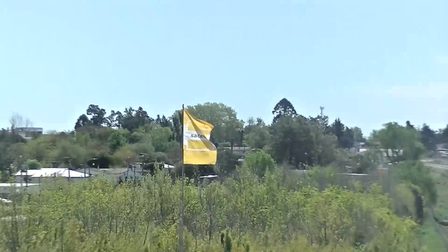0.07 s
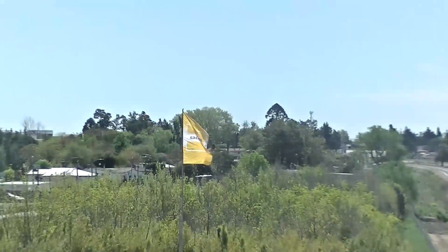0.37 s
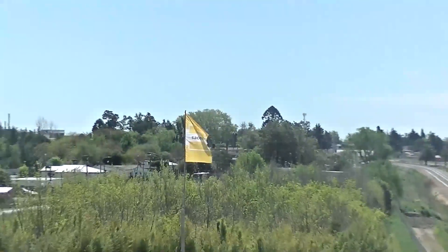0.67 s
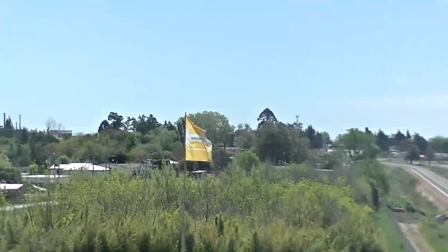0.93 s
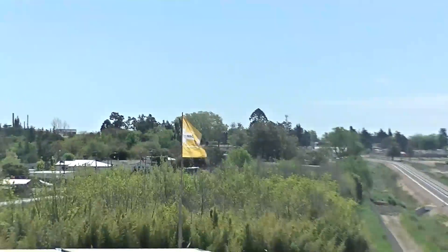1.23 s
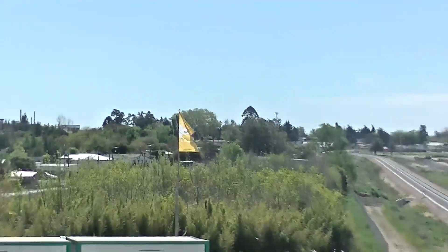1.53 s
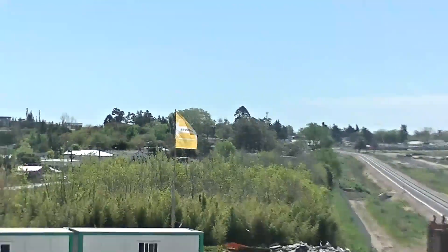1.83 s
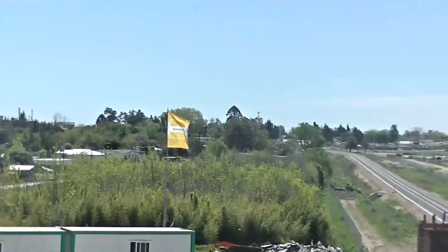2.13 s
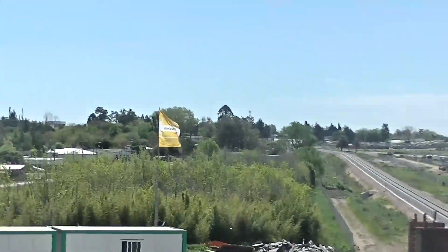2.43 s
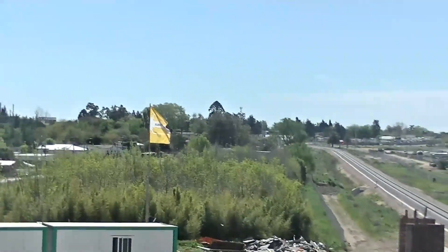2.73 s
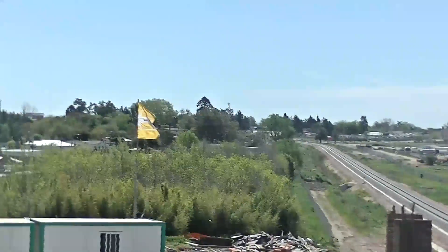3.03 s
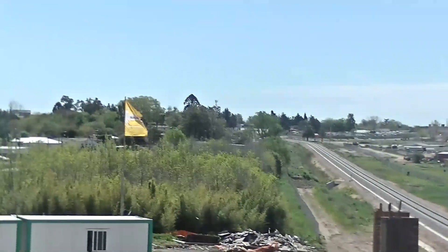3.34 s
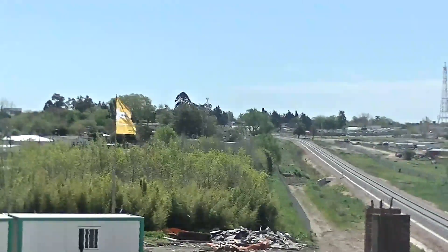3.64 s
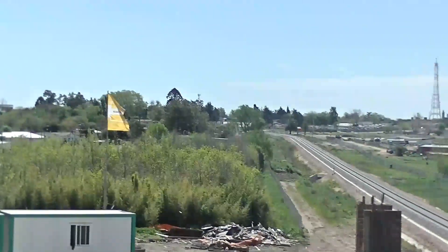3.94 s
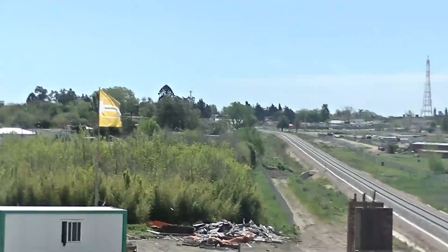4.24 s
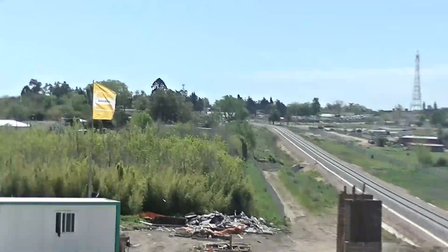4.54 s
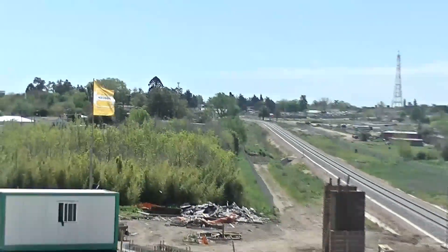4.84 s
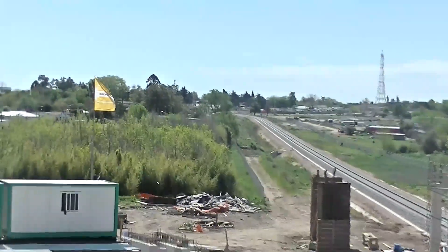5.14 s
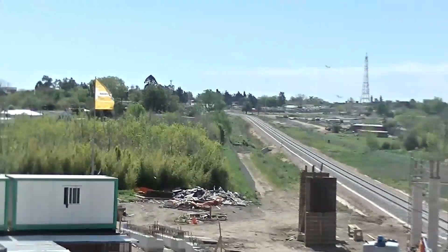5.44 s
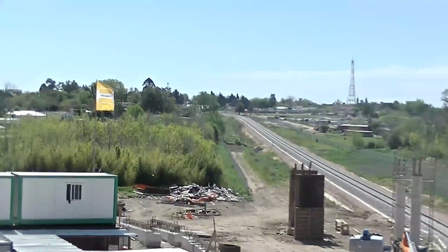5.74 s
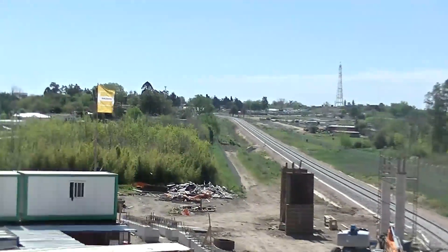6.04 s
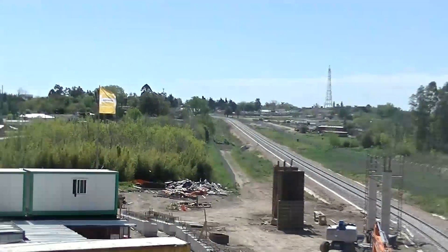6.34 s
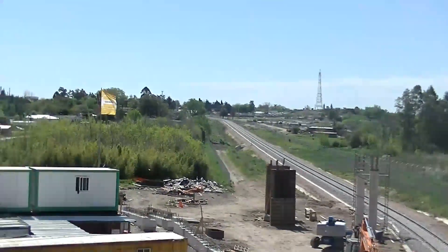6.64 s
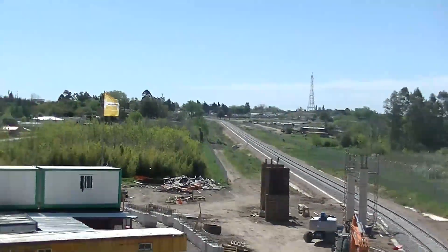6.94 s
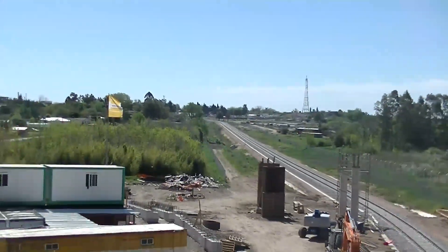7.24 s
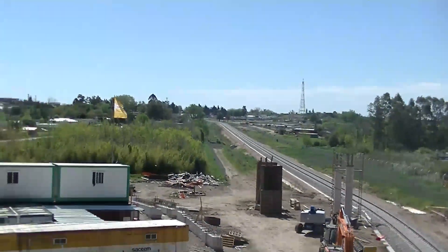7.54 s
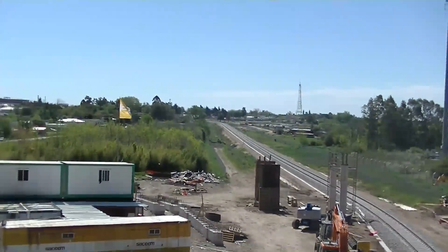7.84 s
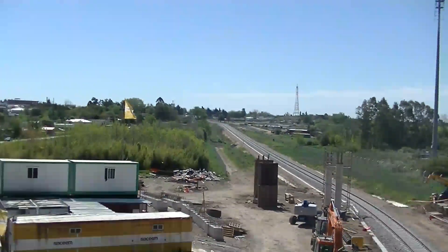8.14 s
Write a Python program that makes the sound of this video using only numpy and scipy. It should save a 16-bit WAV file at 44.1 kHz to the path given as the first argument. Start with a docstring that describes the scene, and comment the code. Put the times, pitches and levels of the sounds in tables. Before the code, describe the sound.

Outdoors, a parakeet gives a brief scratchy call and a squeal. A close plastic double click snaps in the pause, and a far bird whistles faintly once. Then comes a string of shrill, raspy parakeet bursts, peaking in a swooping squeal before turning quieter and sparser. The calls echo slightly off the ground and sheds, over a soft hiss of air, far traffic and a faint hum.

```python
"""Parakeets screech over an open building site: rasping runs of short notes from the syrinx,
some sliding into wavering squeals. Ground and sheds echo them. Two sharp plastic clicks ring
close to the microphone and a far bird whistles once; two soft blips pass. Distant traffic,
open air and a machine hum lie beneath, with a thin whine from the camera."""
import sys
import numpy as np
from scipy import signal
from scipy.fft import rfft, irfft, next_fast_len
from scipy.io import wavfile
from scipy.ndimage import uniform_filter1d, map_coordinates

SR = 44100
rng = np.random.default_rng(int(sys.argv[2]) if len(sys.argv) > 2 else 0)


def transcribe(signal):
    """Save signal, clipped to [-1, 1], as a 16-bit WAV file at the path in sys.argv[1]."""
    frames = np.atleast_2d(signal).T
    limited = np.clip(frames, -1, 1)
    pcm = np.round(limited * 32767).astype(np.int16)
    wavfile.write(sys.argv[1], SR, pcm)


N = 361179


def parakeet_chatter():
    """Runs of scooped notes: each call moves through a crest, arches in pitch and changes pace."""
    # calls: t/s, length/s, start and end pace/(notes/s), mid-call f/Hz, glide/share, note scoop/share,
    # start, crest and end level/dB, crest place/0-1, start and end odd harmonics/dB,
    # roughness/0-1, deepest dip between notes/dB
    calls = [(0.058, 0.22, 43.5, 34.3, 1080, 0.05, 0.034, -41.5, -38, -45, 0.85, 7, 4, 0.33, 11),
             (0.363, 0.042, 44, 55, 1156, 0.061, -0.03, -46, -39, -43, 0.5, -1.5, -4, 0.15, 6),
             (2.338, 0.23, 46.6, 57, 926, 0.063, 0.17, -52.5, -44, -53.5, 0.8, 1, -6.5, 0.55, 11),
             (2.718, 0.13, 38.2, 90, 1130, 0.0, 0.15, -36, -35.5, -35, 0.47, 1.5, -7, 0.45, 13),
             (3.056, 0.16, 35, 76.5, 1099, 0.038, 0.14, -42.5, -34.5, -34, 0.34, -2, 1, 0.43, 17),
             (3.352, 0.19, 50, 48, 1101, 0.053, 0.031, -41, -39.5, -36.5, 0.6, 3, -1.5, 0.51, 7),
             (3.54, 0.201, 58, 80, 985, -0.065, 0.4, -30.5, -30, -34, 0.72, -3, -13.5, 0.66, 9.5),
             (3.84, 0.17, 48.7, 56, 1062, -0.024, 0.13, -39, -39, -36, 0.24, 5, -1, 0.57, 6.5),
             (3.996, 0.14, 44, 88, 1072, -0.085, 0.26, -31, -28, -41, 0.61, -4, -14, 0.62, 11),
             (4.357, 0.21, 35.4, 41.8, 1219, 0.042, 0.1, -32, -25, -33.5, 0.67, 4.5, 5, 0.45, 11),
             (4.834, 0.234, 51, 65, 1300, 0.041, -0.21, -36.5, -31.5, -40, 0.79, -2, -2.5, 0.45, 20),
             (5.988, 0.202, 66, 88, 980, 0.05, 0.3, -39.5, -41, -47.5, 0.37, 1, -4.5, 0.24, 12),
             (6.231, 0.13, 48, 43, 1130, 0.0, 0.12, -45, -41, -51, 0.2, 0, -8, 0.32, 8),
             (6.632, 0.068, 33, 36, 898, -0.066, 0.05, -45, -43, -42.5, 0.48, -4.5, -6.5, 0.33, 5),
             (6.912, 0.13, 46, 36, 975, 0.096, 0.11, -46.5, -46.5, -51.5, 0.7, -4.5, -17, 0.36, 8),
             (8.091, 0.096, 42, 46, 927, -0.013, 0.04, -47.5, -44, -44, 0.5, -6, -3.5, 0.4, 18)]
    attack_s, attack_db, release_s = 0.028, 4, 0.0047
    arch, flick, detune_spread, slide_spread = 0.1, 0.2, 0.035, 0.04  # shares of the pitch
    t = np.arange(N) / SR
    rows = np.array(calls)
    call = np.maximum(np.searchsorted(rows[:, 0], t) - 1, 0)
    (start, length, pace0, pace1, pitch, glide, scoop,
     start_db, crest_db, end_db, crest, odd0_db, odd1_db, rough, dip_db) = rows[call].T
    x = np.clip((t - start) / length, 0, 1)  # 0 to 1 through the call
    centred = 2 * x - 1
    notes = length * x * (pace0 + (pace1 - pace0) * x ** 2 / 3)
    u = 2 * (notes % 1) - 1  # -1 to 1 through the note
    detune, slide, accent_db = rng.standard_normal((len(rows), 32, 3))[call, notes.astype(int)].T
    db = crest_db + (start_db - crest_db) * np.maximum(1 - x / crest, 0) ** 1.64
    db += (end_db - crest_db) * np.maximum((x - crest) / (1 - crest), 0) ** 1.35
    db -= attack_db * np.maximum(1 - x * length / attack_s, 0)
    odd_db = odd0_db + (odd1_db - odd0_db) * x ** 2
    rough = np.clip(rough * (1 + 0.25 * centred), 0, 1)  # a call roughens as it goes
    # rasping notes are pinched apart, the pitch flicking up at each joint; purer ones run on
    joint = np.minimum(amp(odd_db), 1) * abs(u) ** 3.4
    edges = np.sin(np.pi * u / 2) ** 2 * (1 + abs(u)) / 2
    call_hz = pitch * (1 + glide * centred - arch * centred ** 2)
    bend = detune_spread * detune + slide_spread * slide * u + scoop * edges + flick * joint * u ** 2
    gate = amp(-dip_db * joint) * (x > 0) * np.minimum((1 - x) * length / release_s, 1)
    return parakeet_voice(call_hz * (1 + bend), db + accent_db, odd_db, rough, gate)


def parakeet_squeals():
    """Nearly pure cries that swoop without a break, most growing straight out of a call."""
    # pitch curve of each squeal: t/s, f/Hz
    swoops = [
        [(0.402, 1080), (0.412, 1230), (0.425, 1320), (0.442, 1230), (0.454, 720), (0.478, 940), (0.488, 880),
         (0.505, 1010), (0.54, 960)],
        [(2.84, 1100), (2.85, 980), (2.862, 1110), (2.885, 1330), (2.897, 1000), (2.91, 1300), (2.921, 1000),
         (2.93, 1080)],
        [(3.21, 1100), (3.24, 1110), (3.262, 1230), (3.272, 1330), (3.288, 850)],
        [(5.153, 1040), (5.179, 1160), (5.188, 1220), (5.198, 640), (5.207, 1110), (5.214, 730), (5.222, 1030),
         (5.231, 750), (5.24, 1230), (5.255, 1120), (5.264, 830), (5.271, 1230), (5.283, 870), (5.288, 1140),
         (5.32, 850)],
        [(6.368, 950), (6.397, 730), (6.407, 1040), (6.422, 1060), (6.428, 950), (6.438, 1080), (6.45, 900),
         (6.462, 1100), (6.49, 1040)],
        [(6.7, 1150), (6.718, 990), (6.737, 1240), (6.752, 1010), (6.766, 1180), (6.779, 1240), (6.79, 1000)],
    ]
    # envelope of each squeal: t/s, level/dB
    envelopes = [
        [(0.402, -41.5), (0.506, -48), (0.54, -56)],
        [(2.84, -38), (2.87, -31), (2.886, -41.5), (2.896, -34), (2.93, -44.5)],
        [(3.21, -35), (3.246, -34), (3.288, -42)],
        [(5.153, -35), (5.167, -27), (5.209, -21.5), (5.243, -30.5), (5.257, -24), (5.32, -48)],
        [(6.368, -49), (6.402, -39.5), (6.448, -41), (6.49, -47)],
        [(6.7, -44.5), (6.75, -42), (6.79, -52)],
    ]
    t = np.arange(N) / SR
    hz, = curves(np.concatenate(swoops))
    db, = curves(np.concatenate(envelopes))
    gate = sum((t > points[0][0]) * (t < points[-1][0]) for points in envelopes)
    rough = np.clip(0.16 + 0.012 * (db.max() - db), 0, 1)  # softer is hoarser
    return parakeet_voice(smooth(hz, size=110), db, odd_db=np.full(N, -11), rough=rough, gate=gate)


def parakeet_voice(hz, db, odd_db, rough, gate):
    """Syrinx through throat and beak: odd harmonics come in as it rasps and fade as it squeals."""
    # resonance of throat and beak: f/Hz, gain/dB
    throat = [(600, -87), (1400, -20), (2100, -10.5), (2800, 4), (3600, 0.5), (4800, 4), (5600, -3),
              (6800, -4.5), (8200, -21), (10500, -23), (13000, -35.5), (16000, -38)]
    odd = smooth(amp(odd_db), size=90)
    purity = 1 - np.minimum(odd, 1)
    effort_db = smooth(db + 32.5, size=200)
    jitter = .06 * rough * wobble(600)
    phase = 2 * np.pi * np.cumsum(smooth(hz, size=50) * (1 + jitter)) / SR
    voice = np.zeros(N)
    for k in range(1, 8):
        # the fourth harmonic leads, soft calls lean on lower ones, and each flutters
        level = -1.2 * max(k - 4, 0) + 0.16 * effort_db * min(k - 4, 2) + 5 * rough * wobble(220)
        level -= (k != 4) * (3 + k / 2) * purity  # a squeal narrows toward a single tone
        weight = odd * amp(-2.5 * max(k - 3, 0)) if k % 2 else 1
        voice += amp(level) * weight * np.sin(k * phase)
    rasp = (.25 + 2.8 * rough ** 1.4) * np.sqrt(1 + odd ** 2) * rng.standard_normal(N)
    voice = filtered(voice + rasp, lambda f: amp(along(throat, f)))
    treble = filtered(voice, lambda f: 1 / (1 + (5400 / (f + 1)) ** 12))
    voice += treble * (amp(0.39 * effort_db) - 1)  # harder calls are shriller
    voice /= np.sqrt(abs(smooth(voice ** 2, size=260)) + 1e-9)  # even out ahead of the envelope
    shiver_db = 2 * rough * wobble(160)
    return voice * smooth(amp(db - 1.0 + shiver_db) * gate, size=50)


def site_echoes(x, early_db, tail_db):
    """The direct sound in stereo, scattered slaps off ground and sheds, and a faint tail."""
    # direct balance: f/Hz, left minus right/dB
    pan = [(1200, 14), (1900, 1.5), (2700, 6.5), (3400, 10.5), (4200, -1.5), (4900, -3.5), (5700, 12.5),
           (6800, 4), (9000, -6.5)]
    # direct phase: f/Hz, left lead/rad
    lead = [(0, 0), (1720, -0.38), (2670, 0.88), (3620, 0.27), (4820, -0.53), (5430, 1.9), (6030, 0.21),
            (6720, -0.3), (7580, -0.24), (9910, -0.53), (11600, -1.2), (12700, 0.1), (15500, 0.1),
            (16000, -1.3)]
    # decay of the site: f/Hz, t60/s
    decay = [(500, 0.45), (4000, 0.83), (7000, .4), (14000, 0.23)]
    side = np.array([[1], [-1]])
    direct = filtered(x, lambda f: amp(side * along(pan, f) / 2) * np.exp(.5j * side * along(lead, f)))
    hz, t, noise = signal.stft(rng.standard_normal((2, SR)), SR, nperseg=256)
    envelope = amp(-60 * t / along(decay, hz)[:, None]) * (1 - np.exp(-t / 0.011))
    tail = signal.istft(noise * envelope, SR, nperseg=256)[1][:, :SR]
    t = np.arange(SR) / SR
    slaps = rng.standard_normal((2, SR)) * (rng.random(SR) < .02)
    early = slaps * amp(-60 * t / .17) * (t > .002)
    echo = amp(early_db) * early / np.linalg.norm(early[0])
    echo += amp(tail_db) * tail / np.linalg.norm(tail[0])
    return direct + signal.fftconvolve(x[None], echo, axes=1)[:, :N]


def plastic_clicks(crack_db):
    """A snap rings the plastic for milliseconds; the lighter release barely stirs its low modes."""
    # snap and release: t/s, level/dB, low-mode gain/dB
    hits = [(1.6903, -14.5, 0), (1.7313, -35, -18)]
    # modes of the plastic: f/Hz, level/dB, t60/s, left minus right/dB
    modes = [(1620, -6, .007, -2), (2090, -8, 0.021, -2), (2770, -7.5, 0.0084, -3), (3900, 1.5, 0.0069, 2),
             (4620, 0, 0.013, -1), (5700, 6, 0.0082, 5), (6760, 5.5, 0.0035, 4), (9900, 3.5, 0.0078, -3),
             (11720, -10, 0.0065, -8), (13100, -13, .004, -3)]
    out = np.zeros((2, N))
    side = np.array([[1], [-1]])
    t = np.maximum(np.arange(SR // 20) / SR - [[3.5e-5], [0]], 0)  # arrives on the right first
    attack = 1 - np.exp(-t / 0.000067)
    for start, db, low_db in hits:
        ring = 0
        for k, (hz, level, t60, pan) in enumerate(modes):
            mode_db = level + side * pan / 2 + low_db * (hz < 4000) - 60 * t / t60
            ring += (-1) ** k * amp(mode_db) * np.sin(2 * np.pi * hz * t)
        crack = amp(crack_db - 60 * t / 0.01) * rng.standard_normal(t.shape[1])
        out[:, round(start * SR):][:, :t.shape[1]] += amp(db) * (ring + crack) * attack
    # so small a part radiates no bass
    return signal.sosfilt(signal.butter(4, [1200, 13500], "band", fs=SR, output="sos"), out)


def far_whistle(start_s, length_s, pitch_hz, db):
    """A far bird scoops quickly up toward its pitch, swells, then sags."""
    scoop, sag, rise_s = 0.22, 0.12, 0.04
    x = np.clip((np.arange(N) / SR - start_s) / length_s, 0, 1)
    hz = pitch_hz * (1 - scoop * np.exp(-x * length_s / rise_s) - sag * x ** 3)
    envelope = amp(db + 2.8 * wobble(60)) * np.sqrt(abs(np.sin(np.pi * x ** 1.4)))
    return envelope * tone(hz * (1 + 0.0046 * wobble(200)))


def soft_blips():
    """Two brief sine tones, one high and one low, fade in and out."""
    # blips: centre t/s, f/Hz, length/s, peak level/dB
    blips = [(3.943, 1440, 0.0098, -44.5), (7.603, 205, 0.054, -55)]
    t = np.arange(N) / SR
    return sum(amp(db - 8.6 * (2 * (t - centre) / length) ** 2) * np.sin(2 * np.pi * hz * t)
               for centre, hz, length, db in blips)


def machine_hum():
    """A far machine's tones waver on the wind; the upper ones come forward late."""
    # main tone: t/s, f/Hz, level/dB
    run = [(0, 435, -69), (1.2, 427, -81), (2.6, 436.3, -69), (6.3, 445, -65), (7.1, 439.7, -71),
           (7.6, 442, -63), (8.19, 448.6, -60.5)]
    # upper tones: f/Hz, relative level/dB
    partials = [(612, -10.5), (835, -13), (1172, 0), (1232, -7)]
    # their shared envelope: t/s, level/dB
    upper_envelope = [(0, -86), (4, -79), (7.1, -60), (7.6, -65.5)]
    hz, db = curves(run)
    upper_db, = curves(upper_envelope)
    main = amp(db + 1.6 * wobble(8.7)) * tone(hz + 3 * wobble(25))
    lower = amp(db - 8.5 + 3.4 * wobble(4.2)) * tone(387 + 4 * wobble(25))
    upper = sum(amp(upper_db + level + 3 * wobble(25)) * tone(pitch * (1 + .022 * wobble(110)))
                for pitch, level in partials)
    drone = amp(-81.5 + 3.8 * wobble(5.1)) * tone(179 + 6 * wobble(13))
    return main + lower + upper + drone


def camera_whine():
    """A thin, level whine whose pitch trembles separately on each side."""
    return amp(-74.5) * np.array([tone(7870 + 28 * wobble(150)) for _ in range(2)])


def distant_traffic():
    """Far traffic blends into a low, nearly steady rumble."""
    # rumble colour: f/Hz, density/dB
    spectrum = [(15, -70), (25, -42), (54, -30), (140, -15), (172, -10.5), (355, -6), (382, -3.5),
                (411, -7.5), (435, -2.5), (482, -10.5), (616, -15), (682, -19), (800, -18.5), (1040, -36),
                (1760, -120)]
    # rumble envelope: t/s, relative level/dB
    envelope = [(0.0, -66.5), (1.26, -66), (1.37, -68.5), (3.45, -69.5), (8.1, -66)]
    return amp(4.5) * noise_bed(spectrum, envelope, flutter_db=0.76)


def open_air():
    """A broad, even hiss, fullest in the mids."""
    # air colour: f/Hz, density/dB
    spectrum = [(350, -23.5), (600, -10.5), (698, -9.5), (869, -2), (1080, -2), (1210, -4), (1850, -7),
                (2720, -8), (3160, -11), (3890, -12), (7410, -19.5), (8050, -18), (8390, -19), (16000, -28)]
    # air envelope: t/s, level/dB
    envelope = [(0, -56.5), (1.2, -56), (2.3, -57.5), (5.5, -57), (8.19, -56.5)]
    return noise_bed(spectrum, envelope, flutter_db=0.98)


def distant_rush():
    """A far rush that sinks away at first and swells again late."""
    # rush colour: f/Hz, density/dB
    spectrum = [(700, -26), (1300, -2), (2000, 1.5), (3000, -1.5), (4200, -10), (6000, -22), (12000, -70)]
    # rush envelope: t/s, level/dB
    envelope = [(0, -53.5), (1, -68.5), (1.8, -65.5), (5.2, -59.5), (5.8, -55.5), (6.9, -56.5), (7.35, -53),
                (8.19, -53.5)]
    return noise_bed(spectrum, envelope, flutter_db=1.34)


def noise_bed(spectrum, envelope, flutter_db):
    """Gently fluttering coloured noise, widest in the treble."""
    # stereo image: f/Hz, left-right likeness/0-1
    likeness = [(60, 0.75), (130, 0.83), (290, 0.82), (640, 1), (1410, 0.95), (3100, 0.77), (6820, 0.28),
                (15000, 0.17)]

    def mid_side(hz):
        width = np.arccos(np.clip(along(likeness, hz), -1, 1)) / 2
        return amp(along(spectrum, hz)) * [np.cos(width), np.sin(width)]

    db, = curves(envelope)
    mid, side = filtered(rng.standard_normal((2, N)), mid_side)
    noise = np.array([mid + side, mid - side]) * amp(flutter_db * wobble(8.3))
    return amp(db) * noise / np.sqrt(np.mean(noise ** 2) + 1e-20)


def amp(db):
    """Decibels to gain."""
    return 10 ** (np.asarray(db) / 20)


def along(points, hz):
    """Read (f/Hz, value) points on a log frequency axis."""
    f, v = np.transpose(points)
    return np.interp(np.log(hz + 1), np.log(f + 1), v)


def curves(rows):
    """One value per sample for each column after the time."""
    times, *columns = np.transpose(rows)
    return [np.interp(np.arange(N) / SR, times, column) for column in columns]


def wobble(rate):
    """A smooth random curve, rate knots a second."""
    return map_coordinates(rng.standard_normal(int(N * rate / SR) + 4), [np.arange(N) * rate / SR])


def smooth(x, size):
    """Round off corners over size samples."""
    return uniform_filter1d(uniform_filter1d(x, size), size)


def filtered(x, response):
    """Shape x with a complex response of frequency."""
    m = next_fast_len(N + SR // 2)
    return irfft(rfft(x, m) * response(np.fft.rfftfreq(m, 1 / SR)), m)[..., :N]


def tone(hz):
    """A sine of rms 1 that follows a pitch curve."""
    return np.sqrt(2) * np.sin(2 * np.pi * np.cumsum(hz) / SR)


def scene():
    """Echoing parakeets and dry clicks over the site's background."""
    birds = site_echoes(parakeet_chatter() + parakeet_squeals(), early_db=-9.5, tail_db=-16)
    clicks = plastic_clicks(crack_db=-8)
    whistle = far_whistle(start_s=2.04, length_s=0.29, pitch_hz=3400, db=-61.5)
    hums = machine_hum() + camera_whine()
    ambience = distant_traffic() + open_air() + distant_rush()
    return birds + clicks + whistle + soft_blips() + hums + ambience


def record(dry):
    """The camera keeps nothing above its band limit."""
    return filtered(dry, lambda hz: hz < 15800)


dry = scene()
out = record(dry)
transcribe(out)
```